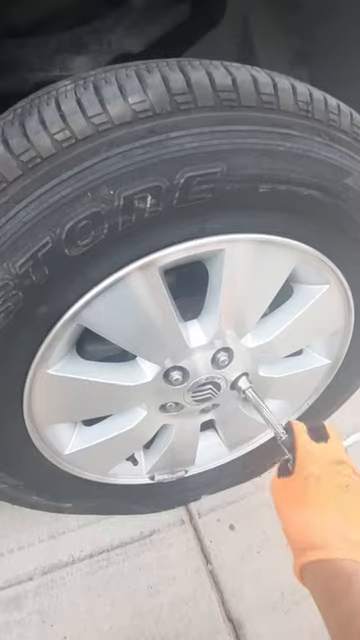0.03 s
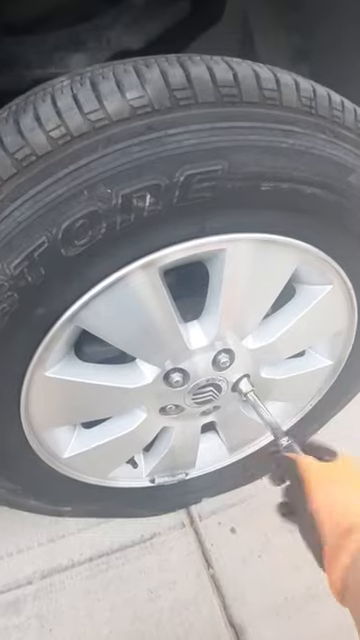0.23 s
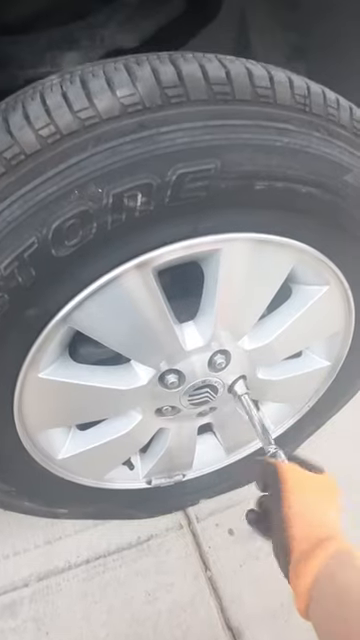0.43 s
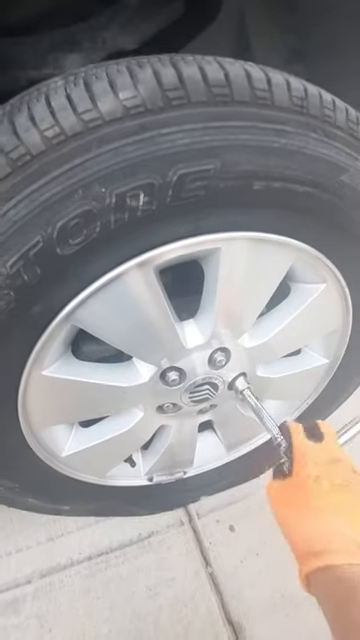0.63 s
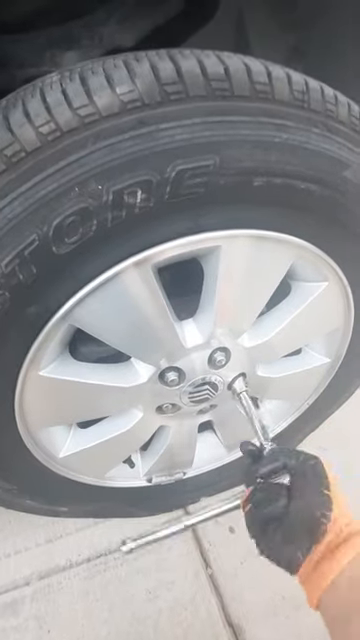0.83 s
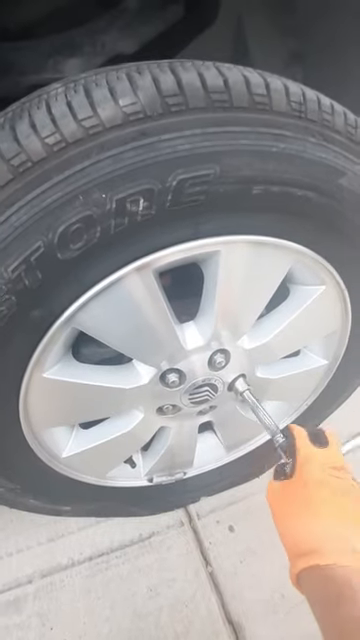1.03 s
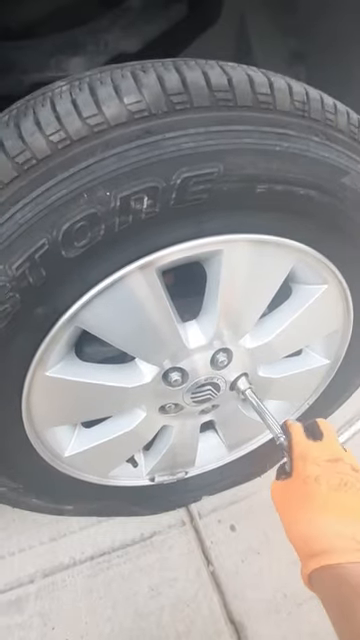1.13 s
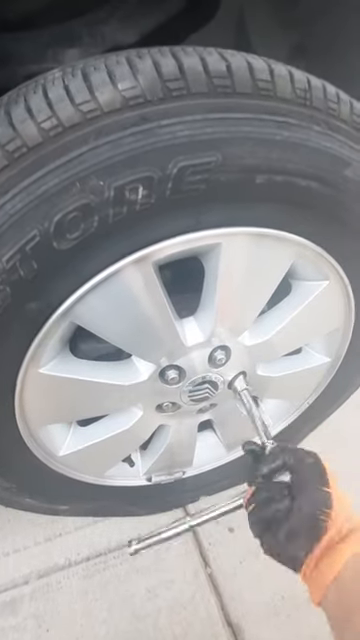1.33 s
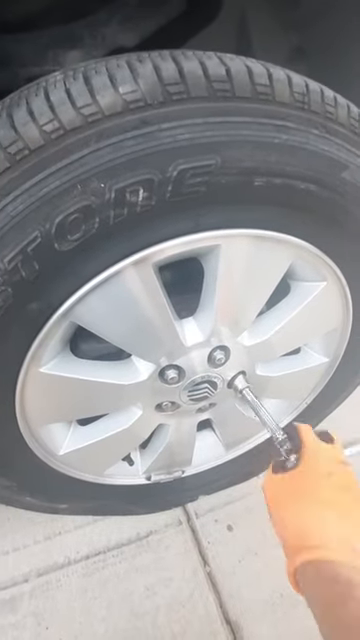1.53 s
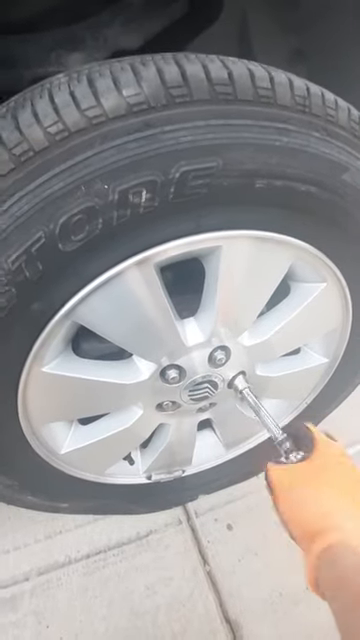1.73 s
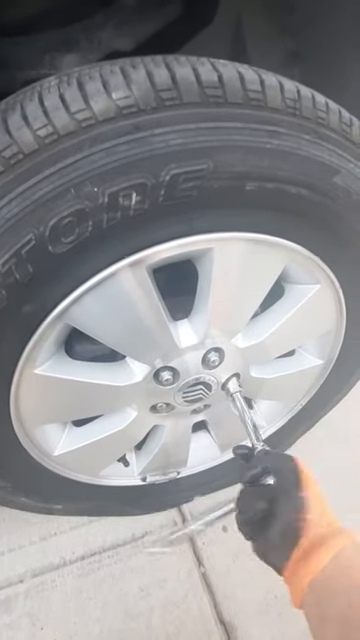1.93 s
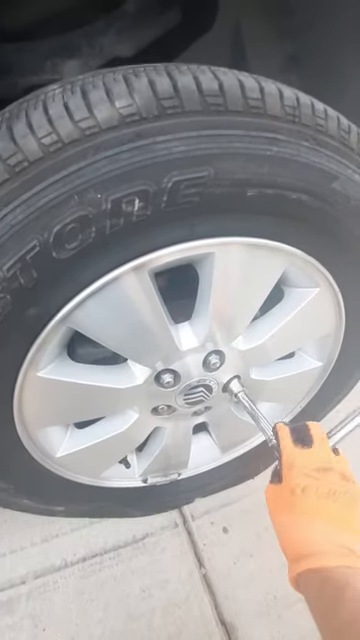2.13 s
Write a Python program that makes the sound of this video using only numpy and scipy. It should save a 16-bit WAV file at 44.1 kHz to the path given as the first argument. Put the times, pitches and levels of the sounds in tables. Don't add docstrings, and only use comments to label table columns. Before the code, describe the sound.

A socket ratchet on a car wheel nut, heard close in stereo outdoors. Fast, bright steel clicking rasps come at about 0.25-0.43, 0.74-0.92, 1.25-1.41 and 1.8-1.96 seconds, slower at each end. The wheel rings and hub thuds dully. Loose parts knock near 0.51, 0.96, 1.48 and 2.02, with faint ticks, a glove rub around 0.83, and low distant traffic throughout.

```python
import sys
import numpy as np
from scipy import signal
from scipy.fft import rfft, irfft
from scipy.io import wavfile

SR = 44100
rng = np.random.default_rng(int(sys.argv[2]) if len(sys.argv) > 2 else 0)


def pcm_store(signal):
    levels = np.round(np.clip(np.atleast_2d(signal), -1, 1) * 32767)
    wavfile.write(sys.argv[1], SR, levels.astype(np.int16).T)


def attenuation_scalar(level_db):
    decades = np.asarray(level_db, float) / 20
    return 10 ** decades


N = 96887
HZ = np.maximum(np.fft.rfftfreq(N, 1 / SR), 1)

TOOTH_CHANCE = rng.standard_normal((4, 30, 2))


def rms_one(x):
    return x / np.sqrt(np.mean(x ** 2) + 1e-20)


def at_hz(points, hz):
    p = np.array(points, float)
    return np.interp(np.log(hz), np.log(p[:, 0]), p[:, 1])


def colour(x, spectrum):
    gain = rms_one(attenuation_scalar(at_hz(spectrum, HZ)))
    return irfft(rfft(x) * gain, N)


def resonance(x, hz, width_hz):
    r = np.exp(-np.pi * width_hz / SR)
    top = [(1 - r * r) / 2, 0, (r * r - 1) / 2]
    bottom = [1, -2 * r * np.cos(2 * np.pi * hz / SR), r * r]
    return signal.lfilter(top, bottom, x)


def drift(rate_hz):
    r = np.exp(-2 * np.pi * rate_hz / SR)
    noise = rng.standard_normal(N + SR)
    return rms_one(signal.lfilter([1], [1, -2 * r, r * r], noise)[SR:])


def bursts(s, db, t60_s):
    rise_s = .0004
    hits = np.full(N, 1e-18)
    np.add.at(hits, (np.asarray(s) * SR).astype(int), attenuation_scalar(2 * np.asarray(db)))
    fall, rise = attenuation_scalar(-120 / (t60_s * SR)), np.exp(-1 / (rise_s * SR))
    power = signal.lfilter([1 - rise], np.convolve([1, -fall], [1, -rise]), hits)
    return np.sqrt(power)


def traffic():
    # pitch_hz, level_db (per Hz)
    hum_colour = [(20, -33), (60, -3), (120, 0), (240, -15.5), (420, -21), (620, -13.5), (900, -28.5),
                  (2500, -47.5)]
    level_db, side_db = -53, -19
    hum = rms_one(colour(rng.standard_normal((2, N)), hum_colour))
    mid, side = hum * attenuation_scalar(level_db + 0.5 * drift(1.5))
    return mid * attenuation_scalar([[-.8], [.8]]) + attenuation_scalar(side_db) * side * [[1], [-1]]


def rub():
    # start_s, level_db
    rub_level = [(0.0, -76), (0.24, -83), (0.44, -63), (0.57, -73.5), (0.71, -78), (0.83, -43.5),
                 (1.06, -74), (1.21, -83), (1.31, -83), (1.48, -61.5), (1.59, -83.5), (1.74, -87.5),
                 (1.94, -67.5), (2.19, -76.5)]
    # pitch_hz, level_db (per Hz)
    rub_colour = [(530, -50), (900, -18), (1000, -3), (1200, -14.5), (3300, -10), (6480, -13.5),
                  (8760, -29), (13500, -16.5), (16000, -38)]
    gain_db = 9
    s, db = np.transpose(rub_level)
    level = attenuation_scalar(np.interp(np.arange(N) / SR, s, db) + gain_db + 1.1 * drift(40))
    return level * colour(rng.standard_normal((2, N)), rub_colour)


def contacts(pawl=0):
    # first_tooth_s, last_tooth_s, level_db, most_load_on_socket_s, most_load_on_pawl_s
    swings = [
        (0.268, .395, -19, 0.33, .382),
        (0.756, .878, -18.5, .84, .855),
        (1.276, 1.384, -18.5, 1.356, 1.39),
        (1.81, 1.934, -19, 1.9, 1.922),
    ]
    tooth_counts = [27, 26, 23, 25]
    # start_s, level_db
    slow_teeth = [
        [(.254, -23.5), (.2602, -16), (.4, -20), (.4062, -17.5), (.4152, -16.5), (.4285, -20)],
        [(.7413, -19.5), (.748, -18), (.8835, -18.5), (.8905, -20), (.9015, -14.5), (.9156, -18)],
        [(1.254, -20), (1.2613, -19), (1.269, -16), (1.3895, -18), (1.3968, -13.5), (1.404, -16),
         (1.413, -17.5)],
        [(1.7963, -19), (1.8035, -28.5), (1.94, -19), (1.9484, -17.5), (1.963, -16)],
    ]
    # start_s, peak_db, thud_db (above the peak), load_db, deep_db (extra deep thud)
    knocks = [(0.1507, -61.5, 10, -3.5, 1.5), (0.5086, -44, 3.5, -13, 11.5), (0.5164, -42, 5, 12, -13),
              (0.5901, -55, 7.5, 3, -2.5), (0.6705, -45.5, 4.5, 15, 5.5), (0.9593, -22.5, -0.5, -13, -25),
              (0.9791, -32.5, 3, -9.5, 6.5), (1.0106, -49, 2, -4.5, 5.5), (1.1707, -64, 6, -7, 10.5),
              (1.484, -24, -20, -7, 0), (1.4808, -31, -6.5, 12, -3.5), (1.4939, -41.5, 7, 10, 2.5),
              (2.019, -23.5, -16, -2, 4.5), (2.0339, -46, 4, 4, -4.5)]
    # start_s, peak_db, load_db
    more_knocks = [(0.2476, -44, 16), (0.4759, -26.5, -16), (.572, -55.5, -6), (.7215, -56, 13),
                   (0.7278, -51.5, 12.5), (.7375, -32, 8), (0.972, -30.5, 8.5), (1.108, -53, -2), (1.2, -64, 6),
                   (1.237, -58.5, 12), (1.2471, -41, 12), (1.6298, -49, -3), (1.6522, -52, -6),
                   (1.733, -64.5, -0.5), (1.7803, -55.5, 19), (1.996, -44, 11)]
    jitter_s, spread_db = .0006, 1.5
    load_width_s, most_load_db = .028, 9
    tooth_thud_db, thud_follows_load = -24.5, 1.25
    rows = []
    for swing, count, slow, chance in zip(swings, tooth_counts, slow_teeth, TOOTH_CHANCE):
        first_s, last_s, level_db, socket_s, pawl_s = swing
        fast_s = np.linspace(first_s, last_s, count) + jitter_s * chance[:count, 0]
        fast_db = level_db + spread_db * chance[:count, 1]
        slow_s, slow_db = np.transpose(slow)
        s, db = np.append(fast_s, slow_s), np.append(fast_db, slow_db)
        most_s = socket_s + pawl * (pawl_s - socket_s)
        load = most_load_db * np.exp(-((s - most_s) / load_width_s) ** 2 / 2)
        rows += zip(s, db, load, tooth_thud_db + thud_follows_load * load, 0 * s)
    rows += [(s, db - 6.0, load, thud + 6, deep) for s, db, thud, load, deep in knocks]
    rows += [(s, db, load, tooth_thud_db, 0) for s, db, load in more_knocks]
    return np.transpose(rows)


def wheel():
    # pitch_hz, level_db, t60_s (time to fall 60 dB)
    rim_tones = [(619, -12.5, 0.63), (997, -20, 0.84), (2099, -23.5, 0.92), (2492, -27, 0.2),
                 (3200, -9.5, 0.56), (4630, -19.5, 0.7), (6360, -25, 0.34)]
    earlier_ring_db, ring_width_hz = -14.5, 15.5
    s, db = contacts()[:2]
    s, db = np.append(s, 0), np.append(db, earlier_ring_db)
    shake = rng.standard_normal((2, N))
    ring = 0
    for hz, level_db, t60_s in rim_tones:
        ring = ring + resonance(shake, hz, ring_width_hz) * bursts(s, db + level_db, t60_s)
    return ring


def chatter(s, db):
    bounce_s, bounce_db = 0.0024, -3.5
    chatter_t60_s, tail_t60_s, tail_db = 0.018, 0.12, -16.5
    hits = bursts(np.append(s, s + bounce_s), np.append(db, db + bounce_db), chatter_t60_s)
    return hits + bursts(s, db + tail_db, tail_t60_s)


def ratchet():
    # pitch_hz, level_db (per Hz)
    click_colour = [(530, -45), (900, -18.5), (1020, -22.5), (2830, -5.5), (3640, -4.5), (6330, -2),
                    (8870, -12), (12700, -7.5), (16000, -2.5)]
    # pitch_hz, width_hz, level_db, load_share, pawl_share (0 socket, 1 pawl)
    head_tones = [(2180, 190, -6, .2, .1), (2960, 790, -2.5, 0.69, 0.12), (5165, 200, -13.5, 0.77, 0.43),
                  (5870, 120, -2.5, .3, .6), (11940, 720, 0.5, .1, .3), (12830, 380, -1.5, .1, 0.33)]
    # pitch_hz, width_hz, level_db, load_share, pawl_share
    singing_tones = [(4770, 130, 3, 1.1, 0), (6330, 70, 9, .9, 1)]
    s, db = contacts()[:2]
    grit = rng.standard_normal((2, N)) * attenuation_scalar(1.6 * drift(750))
    steel = chatter(s, db) * grit
    for hz, width_hz, level_db, share, pawl in head_tones + singing_tones:
        loaded_db = db + share * contacts(pawl)[2]
        steel = steel + attenuation_scalar(level_db) * resonance(chatter(s, loaded_db) * grit, hz, width_hz)
    return attenuation_scalar(-1) * colour(steel, click_colour)


def hub_thud():
    # pitch_hz, width_hz, level_db, deep_share (of the deep thud)
    hub_tones = [(110, 27, -8.5, 1.43), (337, 43, -10, 1.54), (421.3, 23.2, -7.5, 1.3),
                 (547.6, 44.6, -5, 0.17), (627, 49.6, -0.5, 0.3), (785.4, 50.4, -4.5, 0.26),
                 (1020, 45, -7.5, 0.076), (1497, 367, -10, 0.2)]
    thud_t60_s, gain_db = 0.049, 20.5
    s, db, load, thud, deep = contacts()
    noise = rng.standard_normal((2, N))
    total = 0
    for k, (hz, width_hz, level_db, share) in enumerate(hub_tones):
        push = noise * bursts(s, db + thud + share * deep, thud_t60_s)
        sign = (-1) ** k
        total = total + sign * attenuation_scalar(level_db + gain_db) * resonance(push, hz, width_hz)
    return total


def ports(pair):
    # pitch_hz, level_db
    left_minus_right = [(350, 0.5), (700, 7), (1400, -4), (2800, -3.4), (5600, -9.5), (9500, 1.5),
                        (13500, -11.5)]
    # pitch_hz, share (0 to 1)
    likeness = [(120, 1), (350, 0.73), (700, 0.95), (1400, 0.81), (3000, 0.22), (6000, 0.16), (13000, .25)]
    # pitch_hz, lead_radians
    left_lead = [(120, -0.13), (350, 1.57), (700, -0.9), (1400, -1.75), (2800, -2.5), (5600, -7),
                 (13500, -13.5)]
    a, b = rfft(pair)
    alike = np.clip(at_hz(likeness, HZ), 0, 1)
    tilt_db = at_hz(left_minus_right, HZ) / 2
    left = (alike * a + np.sqrt(1 - alike ** 2) * b) * np.exp(1j * at_hz(left_lead, HZ))
    return irfft(np.array([left * attenuation_scalar(tilt_db), a * attenuation_scalar(-tilt_db)]), N)


def scene():
    near = rub() + wheel() + ratchet() + hub_thud()
    return traffic() + ports(near)


def band_limit(x):
    return signal.sosfilt(signal.butter(12, 16820, fs=SR, output="sos"), x)


def record(dry):
    cutoff_hz = 15650
    rounded = .9 * np.tanh(dry / .9)
    low_pass = signal.ellip(12, .5, 70, cutoff_hz - 150, fs=SR, output="sos")
    mix = signal.sosfilt(low_pass, rounded)
    return band_limit(mix)


dry = scene()
out = record(dry)
pcm_store(out)
```